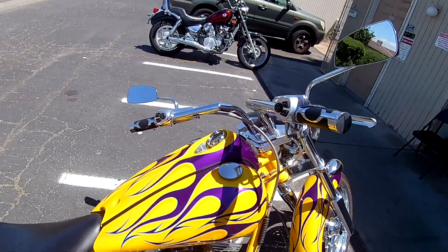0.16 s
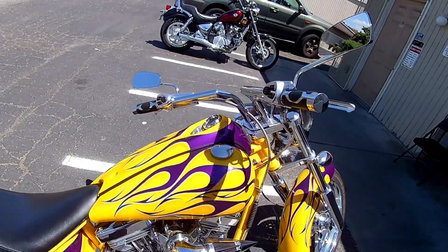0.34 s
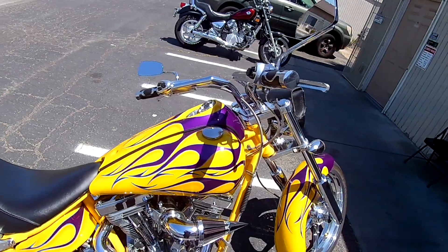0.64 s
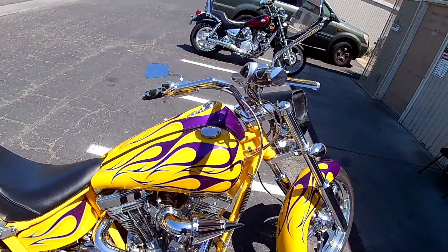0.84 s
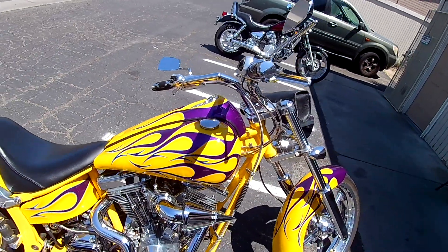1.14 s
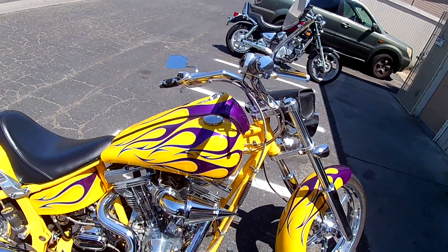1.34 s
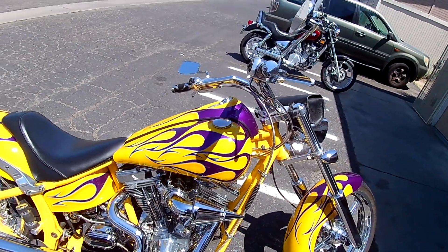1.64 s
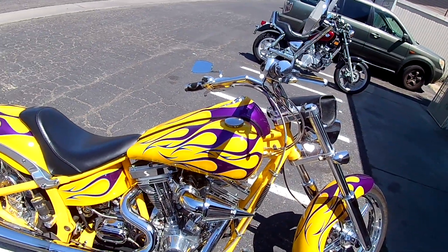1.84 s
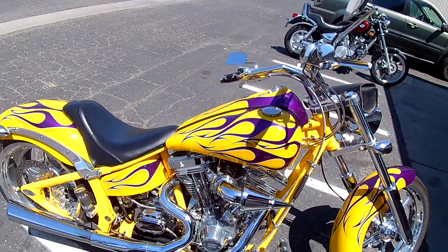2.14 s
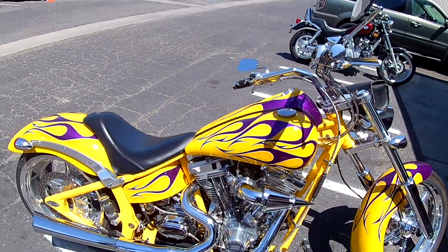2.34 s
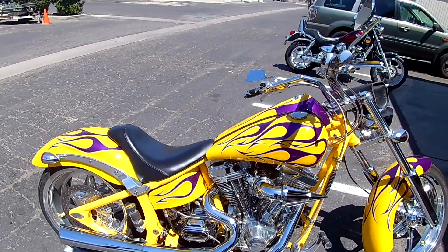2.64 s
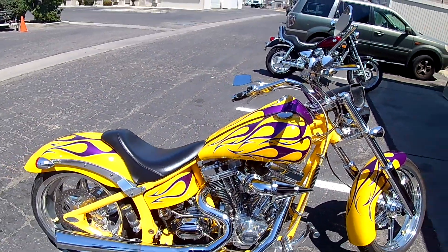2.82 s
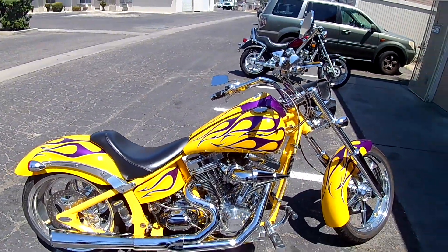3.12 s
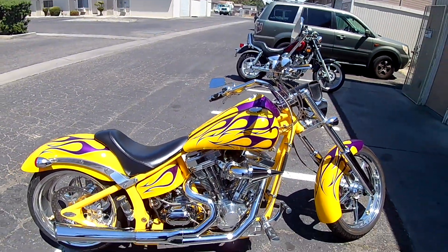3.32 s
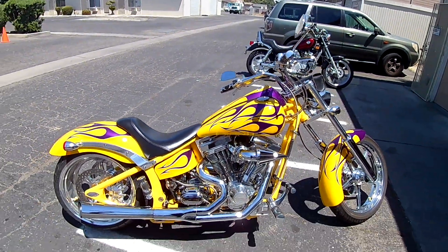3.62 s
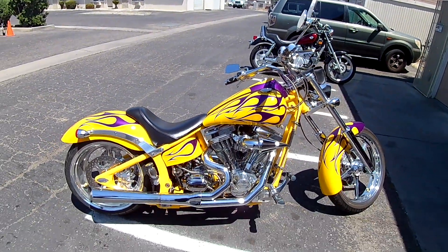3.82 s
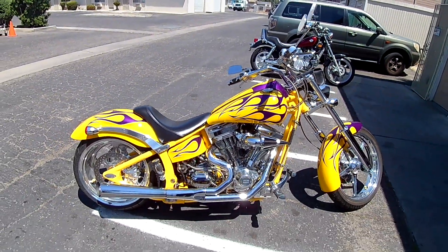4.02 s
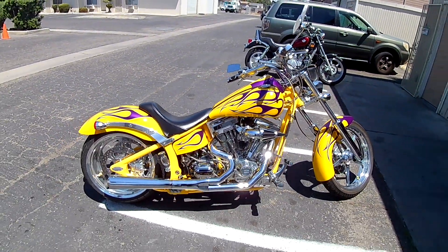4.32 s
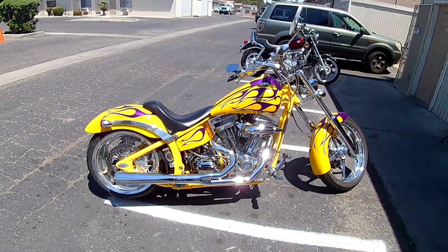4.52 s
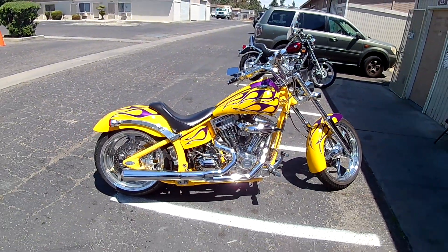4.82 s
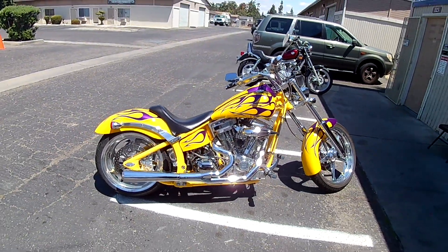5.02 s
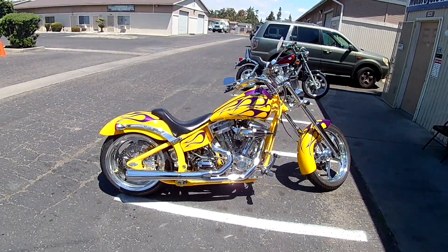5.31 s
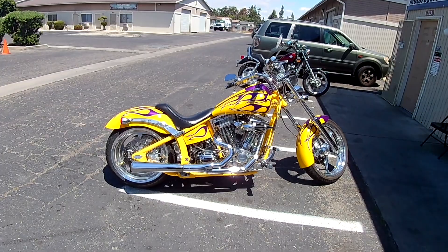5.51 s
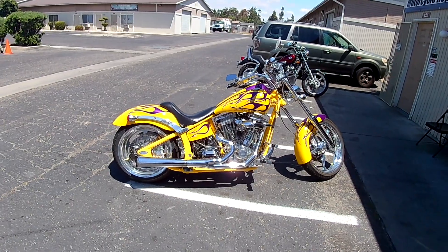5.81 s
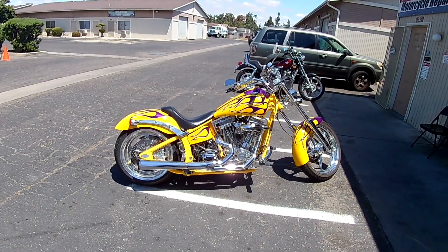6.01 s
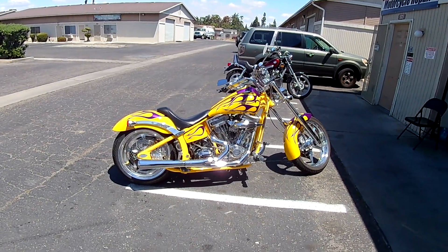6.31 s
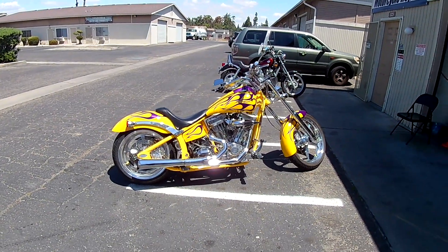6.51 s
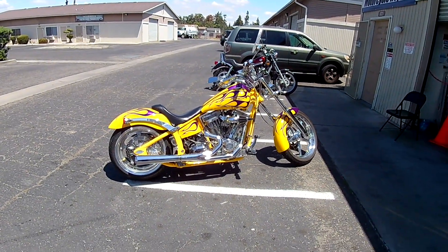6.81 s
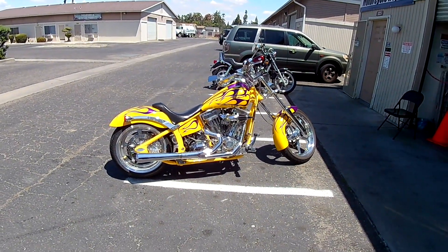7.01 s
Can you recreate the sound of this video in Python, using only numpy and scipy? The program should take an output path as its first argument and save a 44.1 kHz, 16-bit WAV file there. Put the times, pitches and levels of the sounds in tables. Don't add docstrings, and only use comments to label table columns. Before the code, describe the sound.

A large V-twin motorcycle idles outdoors beside a building. Two hard exhaust strokes boom and crack, then two or three weaker strokes only thud, over and over in a loping, irregular rhythm. Valve gear clatters beneath with a thin metallic sizzle. The handheld microphone starts close and backs away, so the clatter fades while the pipes stay strong. Wind gusts rumble low, and the loud bass slightly overloads the microphone.

```python
import sys
import numpy as np
from scipy import signal
from scipy.fft import rfft, irfft, next_fast_len
from scipy.io import wavfile
from scipy.ndimage import uniform_filter1d

SR = 44100
rng = np.random.default_rng(int(sys.argv[2]) if len(sys.argv) > 2 else 0)


def to_wav(s):
    ch = np.atleast_2d(s).T
    pcm = np.round(np.clip(ch, -1, 1) * 32767)
    wavfile.write(sys.argv[1], SR, pcm.astype(np.int16))


def ratio(d):
    e = np.asarray(d, float) / 20
    return 10 ** e


N = 315315

# start_s, boom_db, valve_open_s, crack_db, crack_ring_hz
FIRST_FIRINGS = [(-.055, -7, 0.052, -39, 900), (0.318, -10, .05, -16, 580), (0.709, -8, 0.063, -18, 980),
                 (1.111, -10, .09, -18.5, 780), (1.487, -10, 0.12, -18, 554), (1.728, -9.5, .06, -16, 1240),
                 (2.151, -9, .12, -16, 840), (2.522, -9.4, .09, -14.5, 950), (2.857, -9, 0.066, -18, 970),
                 (3.272, -8, 0.078, -18.5, 950), (3.708, -8.5, 0.22, -19, 950),
                 (4.185, -11, .105, -10, 1116), (4.593, -10, .07, -11.5, 1010),
                 (4.992, -10.5, .09, -12, 1250), (5.414, -11, .12, -13.5, 930),
                 (5.804, -11.5, .06, -15, 907), (6.236, -15, .06, -19, 1000),
                 (6.689, -12.5, 0.055, -14, 804)]
# start_s, boom_db, valve_open_s, crack_db, crack_ring_hz
SECOND_FIRINGS = [(.033, -9, .08, -26, 805), (0.425, -6.5, .07, -18, 625), (0.82, -9, 0.078, -21, 664),
                  (1.205, -8.5, .07, -17.5, 875), (1.842, -7, 0.076, -17.5, 1030),
                  (2.195, -35, .05, -23, 546), (2.259, -6, .05, -15, 990), (2.944, -7.5, .09, -14, 641),
                  (3.355, -10, 0.11, -12.5, 970), (3.784, -7.5, 0.055, -12.5, 1050),
                  (4.287, -10, 0.088, -14, 1010), (4.707, -8, 0.076, -10, 700),
                  (5.098, -9, .09, -18.5, 1045), (5.52, -7.5, .07, -14, 716),
                  (5.924, -10.5, 0.058, -21.5, 1030), (6.349, -11.5, .06, -20.5, 680),
                  (6.802, -8.5, .07, -13.5, 1000)]


def rms_one(x):
    return x / np.sqrt(np.mean(x ** 2) + 1e-20)


def band(x, low_hz, high_hz, order=2):
    return signal.sosfilt(signal.butter(order, [low_hz, high_hz], "band", fs=SR, output="sos"), x)


def coloured(spectrum, size):
    hz, level_db = np.transpose(spectrum)
    bins = np.fft.rfftfreq(size, 1 / SR) + 1
    shape = ratio(np.interp(np.log(bins), np.log(hz), level_db, left=-90, right=-90))
    return rms_one(irfft(rfft(rng.standard_normal(size)) * shape, size))


def drift(rate_hz):
    hop = 40
    r = np.exp(-2 * np.pi * rate_hz * hop / SR)
    noise = rng.standard_normal(N // hop + 2002)
    slow = signal.lfilter([1], [1, -2 * r, r * r], noise)[2000:]
    return np.interp(np.arange(N) / hop, np.arange(len(slow)), rms_one(slow))


def resonate(x, modes):
    out = 0
    for k, (hz, width_hz, level_db) in enumerate(modes):
        r = np.exp(-np.pi * width_hz / SR)
        poles = [1, -2 * r * np.cos(2 * np.pi * hz / SR), r * r]
        mode = signal.lfilter([1 - r, 0, r - 1], poles, x)
        out = out + (-1) ** k * ratio(level_db) * mode
    return out


def add(out, s, piece):
    i = round(s * SR)
    first, last = max(i, 0), min(i + len(piece), N)
    out[first:last] += piece[first - i:last - i]


def pulse(t, peak_s, decay_s):
    return (t / peak_s) ** 2 * np.exp(2 - 2 * t / decay_s)


def strokes():
    # start_s, boom_db, valve_open_s, note_hz
    early_misses = [(.125, -14.5, 0.052, 54.5), (.511, -15, 0.1, 48), (0.917, -15.5, .08, 65),
                    (1.29, -12.5, 0.078, 45.9), (1.596, -10, .105, 65.5), (1.934, -12, .05, 52),
                    (2.338, -11.3, .09, 51), (2.648, -24, 0.12, 62.7), (3.04, -13.5, .07, 50.8),
                    (3.475, -13.5, 0.089, 48), (3.875, -10.7, 0.09, 50.4), (4.378, -13, 0.072, 52),
                    (4.792, -18.5, .12, 52), (5.196, -15, 0.065, 60.7), (5.603, -17, .12, 52),
                    (6.01, -17, .105, 62.6), (6.45, -15.5, 0.1, 52), (6.883, -17.5, 0.096, 52)]
    # start_s, boom_db, valve_open_s, note_hz
    late_misses = [(.234, -21, .12, 61.1), (0.622, -13.5, 0.087, 46.8), (1.02, -11, .09, 55.2),
                   (1.399, -10.8, 0.076, 46), (2.055, -14, 0.069, 45), (2.445, -12.5, .07, 48.7),
                   (2.739, -19, .12, 52.8), (3.145, -14, 0.11, 52), (3.61, -14.5, 0.11, 52),
                   (3.996, -13, 0.088, 69.3), (4.098, -14.4, 0.093, 48.3), (4.497, -15, 0.081, 44.5),
                   (4.906, -14.5, 0.085, 45.2), (5.302, -17, 0.092, 49.2), (5.718, -16.5, 0.074, 45.6),
                   (6.131, -19.5, 0.13, 45.6), (6.559, -29.5, .12, 61.3), (6.994, -16, .09, 47.9),
                   (7.095, -16, 0.045, 57.8)]
    miss_top_hz = 71.6
    rows = []
    for s, boom_db, open_s, note_hz in early_misses + late_misses:
        rows.append((s, boom_db, note_hz, max(miss_top_hz / note_hz - 1, 0), open_s, -50))
    for table, note_hz, top_hz in (FIRST_FIRINGS, 52.94, 68.9), (SECOND_FIRINGS, 52, 74.5):
        for s, boom_db, open_s, crack_db, _ in table:
            rows.append((s, boom_db, note_hz, top_hz / note_hz - 1, open_s, crack_db - 7.0))
    return rows


def pipes():
    # multiple of the round trip, level_db under the boom
    overtones = [(2, -9), (3, -6), (4, -32.5), (5, -24.5)]
    out, t = np.zeros(N), np.arange(8000) / SR
    for s, boom_db, note_hz, rise, open_s, charge_db in strokes():
        turns = np.cumsum(note_hz * (1 + rise * np.minimum(t / open_s, 1))) / SR
        boom = (1 - np.exp(-t / 0.004)) * np.exp(-t / 0.25) * np.sin(2 * np.pi * turns)
        late = np.maximum(t - min(open_s, 0.125), 0)
        shut = 0.9 * np.exp(-late / 0.014) + 0.1 * np.exp(-late / 0.04)
        trips = t * note_hz * (1 + 0.54 * rise) - 0.07
        front = 0
        for k, level_db in overtones:
            uneven_db = 1.3 * rng.standard_normal()
            front = front + ratio(level_db + uneven_db) * np.cos(2 * np.pi * int(k) * trips)
        onset = np.minimum(turns / 0.9, 1) ** 2
        fading = onset * (0.6 * np.exp(-(turns / 1.5) ** 4) + 0.4 * np.exp(-t / 0.06))
        heat = np.clip((charge_db + 43.5) / 25, 0.3, 1.1)
        add(out, s + 0.0013, -ratio(boom_db + 0.97) * shut * (boom + heat * fading * front))
    return out


def cracks():
    # hz, level_db per Hz
    crack_colour = [(350, -14), (500, -8.5), (700, 2), (1100, -5), (1650, -3.5), (2100, -4.5),
                    (2600, -22.5)]
    # upper_ring_hz, rim_db re the crack
    first_rings = [(1510, -30), (1280, -21), (1750, -20), (1700, -27), (1300, -27), (2170, -34),
                   (2200, -19.5), (1530, -21), (1270, -23), (1630, -34), (1360, -31.5), (1616, -37),
                   (1640, -25.5), (1530, -28), (1320, -28.5), (1810, -23), (1440, -22), (1670, -21.5)]
    # upper_ring_hz, rim_db re the crack
    second_rings = [(1500, -29), (1790, -34), (1380, -20), (2200, -17), (2190, -19), (2070, -12.5),
                    (1530, -15.5), (1540, -19.5), (1490, -23), (1600, -16), (1670, -26.5), (1630, -23.5),
                    (1254, -36), (1500, -28.5), (1370, -27.5), (1490, -31.5), (1455, -27.5)]
    rim_modes = [(4080, 430, 1.5), (5250, 410, -8.0)]
    out, t = np.zeros(N), np.arange(4096) / SR
    burst = pulse(t, 0.0058, 0.0051)
    tail = 0.16 * (1 - np.exp(-t / 0.012)) * np.exp(-t / 0.035)
    snap = pulse(t, 0.0036, 0.0034) + 0.87 * tail
    firings = zip(FIRST_FIRINGS + SECOND_FIRINGS, first_rings + second_rings)
    for (s, _, _, peak_db, low_hz), (high_hz, rim_db) in firings:
        gas = coloured(crack_colour, size=len(t))
        body = rms_one(0.25 * gas + resonate(gas, [(low_hz, 130, 0), (high_hz, 130, 4)]))
        rim_hz = 2400 + 110 * s + 120 * rng.standard_normal()
        rim = rms_one(band(rng.standard_normal(len(t)), rim_hz - 330, rim_hz + 330))
        top = resonate(rng.standard_normal(len(t)), rim_modes)
        top = rms_one(band(top, 3300, 5600, order=3))
        top_db = -44 + 2 * min(s, 4.53)
        treble = ratio(rim_db + 5.0) * rim + ratio(top_db + 11.0) * top
        add(out, s + 0.0005, ratio(peak_db - 6.5) * ((burst + tail) * body + snap * treble))
    slap = round(0.016 * SR)
    out[slap:] += 0.3 * band(out[:-slap], 200, 4500, order=1)
    return out


def taps(per_s, spread_db):
    sizes = ratio(spread_db * np.minimum(rng.exponential(1, N), 4)) * rng.choice([-1, 1], N)
    return rms_one(sizes * (rng.random(N) < per_s / SR) + 1e-9)


def clatter(level_db):
    # hz, level_db per Hz
    clatter_colour = [(300, 2.5), (500, -10.5), (700, -1.5), (950, 1), (1250, -6.5), (1600, -2), (1800, -7),
                      (2100, -8.5), (2600, -27), (3300, -31), (4000, -36), (6000, -45.5)]
    # hz, width_hz, level_db
    case_modes = [(944, 64, -6), (1657, 18, 1), (1799, 38, 0.5)]
    rush = coloured(clatter_colour, size=next_fast_len(N))[:N]
    ring = rms_one(resonate(taps(1300, spread_db=-3.0), case_modes))
    flicker_db = 1.3 * drift(18) + 1.1 * drift(40)
    return ratio(level_db - 1.1 + flicker_db) * (rush + 0.49 * ring)


def stroke_swell(peak_s, spread_db):
    out, t = np.zeros(N), np.arange(5000) / SR
    for start_s, *_ in strokes():
        size = ratio(spread_db * rng.standard_normal())
        add(out, start_s - 0.012, size * pulse(t, peak_s, peak_s))
    return out


def fins(level_db):
    # hz, width_hz, level_db
    fin_modes = [(4090, 330, 1), (4470, 2100, -2.5), (5370, 920, -1.5)]
    steady = rms_one(resonate(taps(1400, spread_db=2.5), fin_modes))
    steady = band(steady, 3300, 5900, order=3)
    whistle = resonate(rng.standard_normal(N), [(5424, 690, 0)])
    whistle = rms_one(resonate(whistle, [(4540, 1700, 0)]))
    flicker_db = 1.6 * drift(24)
    swell = stroke_swell(0.022, spread_db=1.8)
    return ratio(level_db - 0.6) * (ratio(flicker_db) * steady + 1.4 * swell * whistle)


def wind(body_db):
    # middle_s, length_s, peak_db
    gusts = [(0.085, 0.25, -36), (0.31, 0.081, -39.5), (0.788, 0.29, -38.5), (1.222, 0.39, -31),
             (1.678, 0.53, -35), (1.994, 0.18, -32.5), (2.321, 0.65, -33.5), (2.665, 0.29, -43.5),
             (3.692, 0.26, -28.5), (3.903, 0.18, -34), (4.047, 0.18, -29.5), (4.326, 0.52, -33),
             (5.366, 0.18, -30), (5.544, 0.16, -36), (6.281, 0.28, -39), (6.797, .3, -43)]
    # hz, level_db per Hz
    turbulence = [(25, -6.5), (60, 7.5), (105, 8.5), (180, -0.5), (300, -8.5), (450, -14), (700, -23)]
    level = ratio(body_db - 1.5 + 0.1 * np.arange(N) / SR)
    for middle_s, length_s, peak_db in gusts:
        add(level, middle_s - length_s / 2, ratio(peak_db) * np.hanning(round(length_s * SR)))
    rumble = coloured(turbulence, size=next_fast_len(N))[:N]
    return level * ratio(10 + 2.9 * drift(24)) * rumble


def scene():
    # time_s, level_db
    body_curve = [(0, -35.5), (.3, -37), (1.29, -37), (2.41, -37), (3.09, -37), (3.64, -40), (3.76, -36),
                  (4.54, -39.5), (5.67, -40.5), (6.57, -44), (6.83, -39), (7.15, -45)]
    t = np.arange(N) / SR
    body_db = np.interp(t, *np.transpose(body_curve))
    fin_db = body_db - 21 - 0.57 * t
    return (pipes() + cracks() + clatter(body_db) + fins(fin_db) + wind(body_db))[None]


def gate(x):
    hz, _, cells = signal.stft(x, SR, nperseg=1024)
    power = uniform_filter1d(np.abs(cells) ** 2, size=5, axis=1)
    power = uniform_filter1d(power, size=4, axis=2)
    level_db = 10 * np.log10(power + 1e-20)
    margin_db = np.interp(hz, [2310, 2810, 5630, 6200], [30, 1.4, 0.6, 0.7])[:, None]
    kept = level_db > uniform_filter1d(level_db, size=31, axis=1) - margin_db
    return signal.istft(cells * kept, SR, nperseg=1024)[1][:, :N]


def roll_off(x):
    return signal.sosfilt(signal.butter(12, 15720, fs=SR, output="sos"), x)


def record(dry):
    # hz, level_db per Hz
    hiss_colour = [(5500, -16), (6600, 1), (7600, -19.5), (8300, 4.5), (12000, 6), (15800, 4)]
    dry = signal.sosfilt(signal.butter(2, 22, "high", fs=SR, output="sos"), dry)
    loudness = np.sqrt(np.maximum(uniform_filter1d(dry ** 2, size=1300), 0))
    hiss_level = ratio(-52.0) * loudness ** 1.25 + ratio(-86.5)
    hiss = hiss_level * coloured(hiss_colour, size=next_fast_len(N))[:N]
    rounded = 1.238 * np.tanh(dry / 1.312)
    return roll_off(gate(rounded + hiss))


dry = scene()
out = record(dry)
to_wav(out)
```